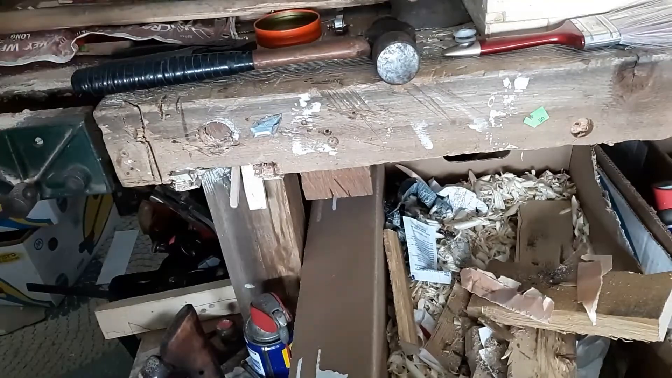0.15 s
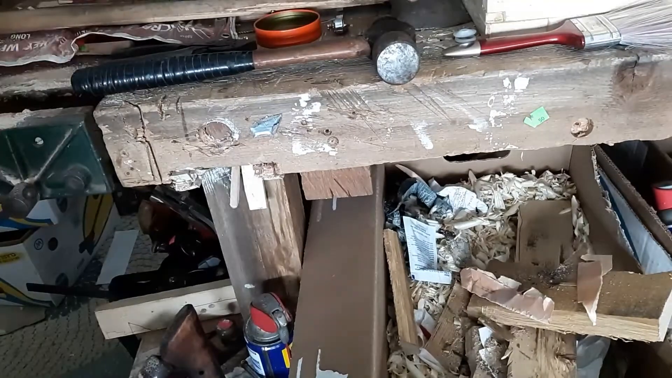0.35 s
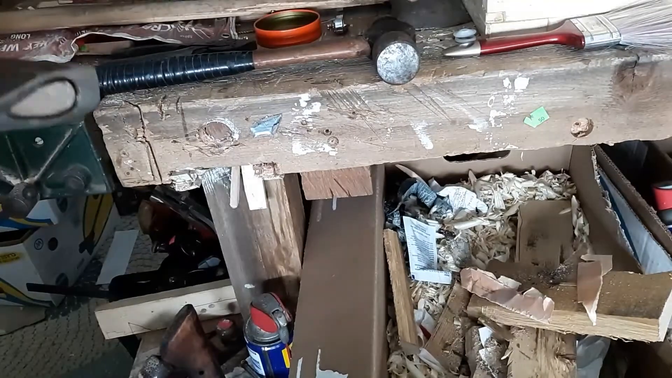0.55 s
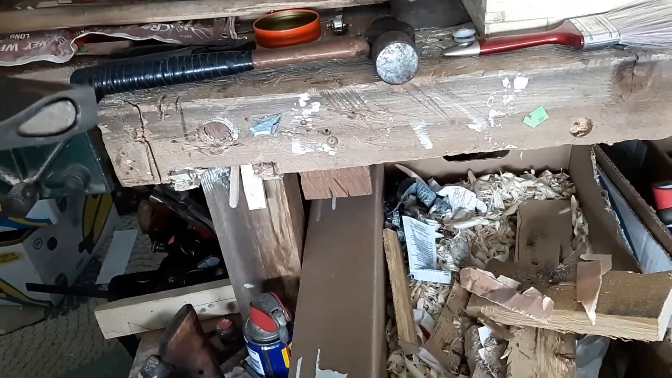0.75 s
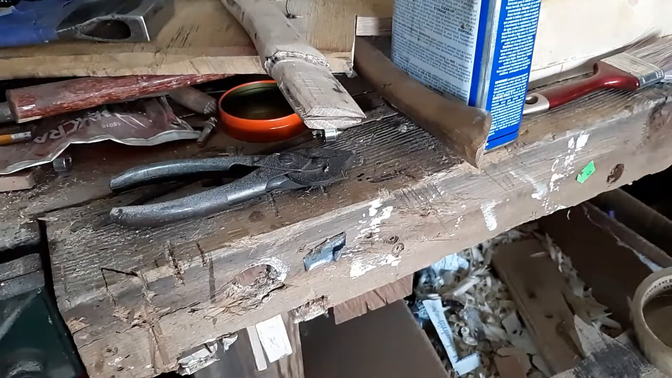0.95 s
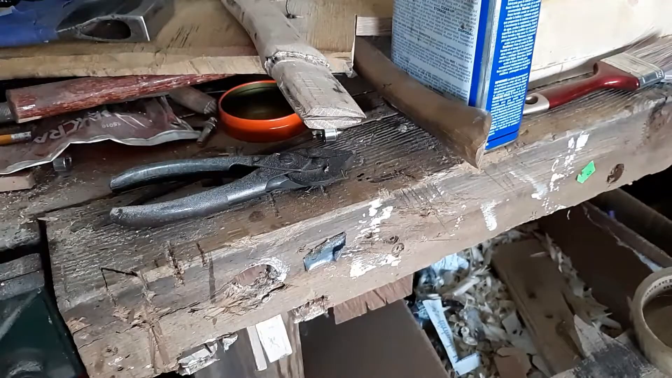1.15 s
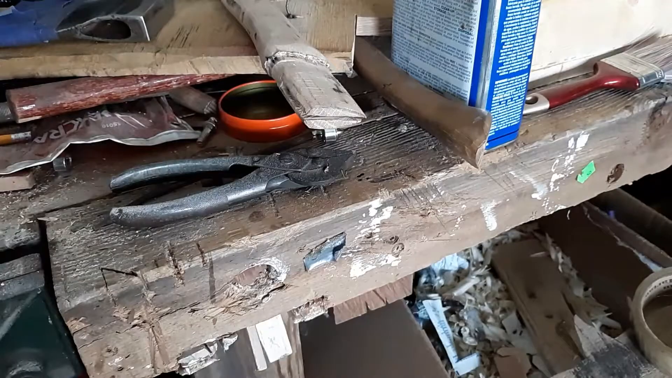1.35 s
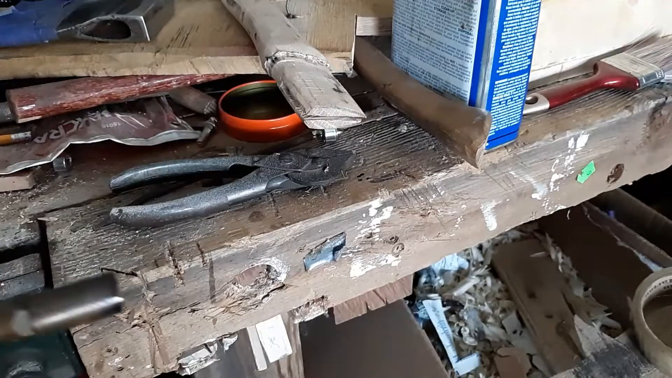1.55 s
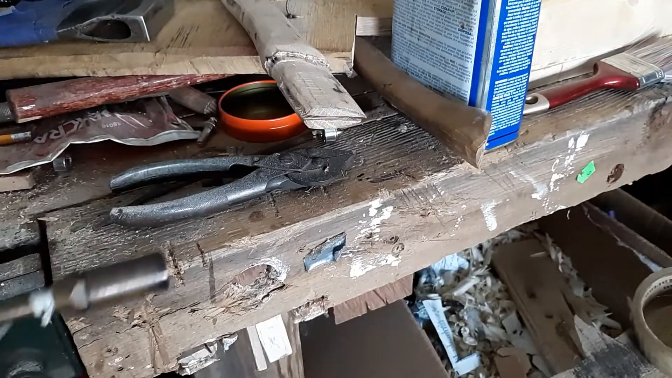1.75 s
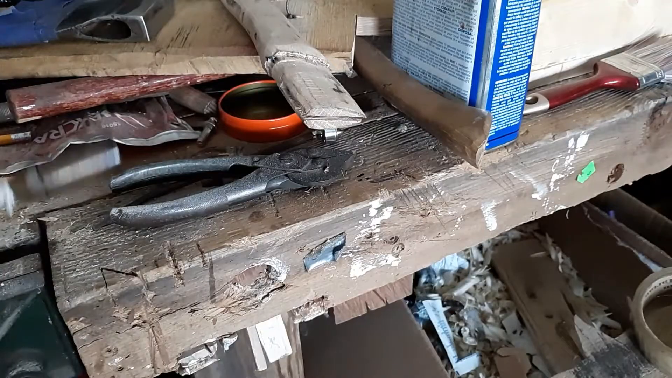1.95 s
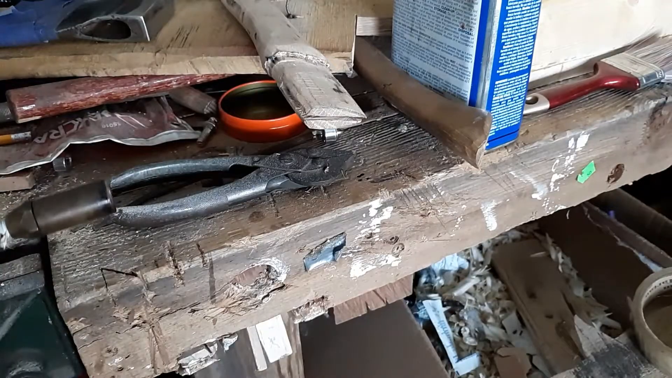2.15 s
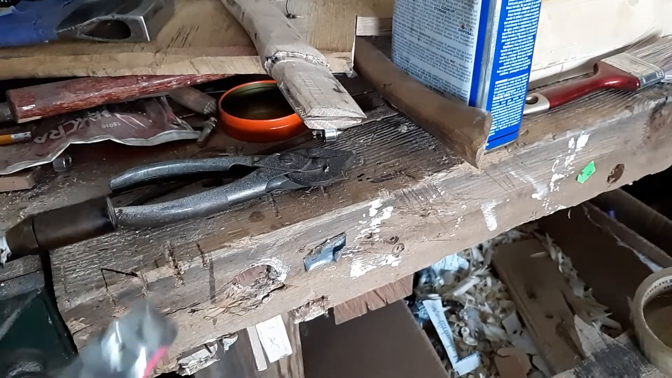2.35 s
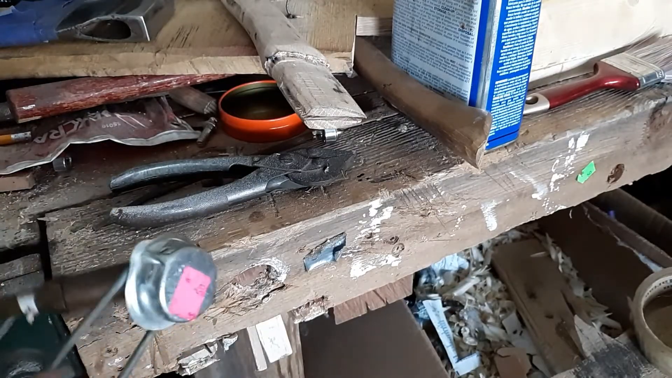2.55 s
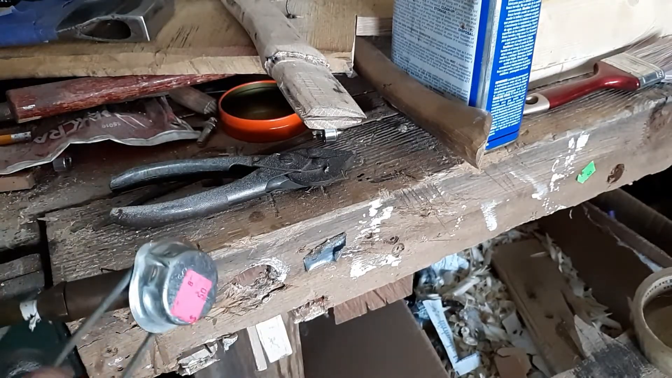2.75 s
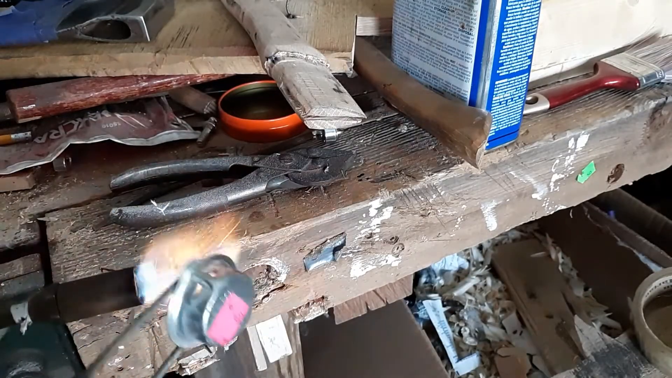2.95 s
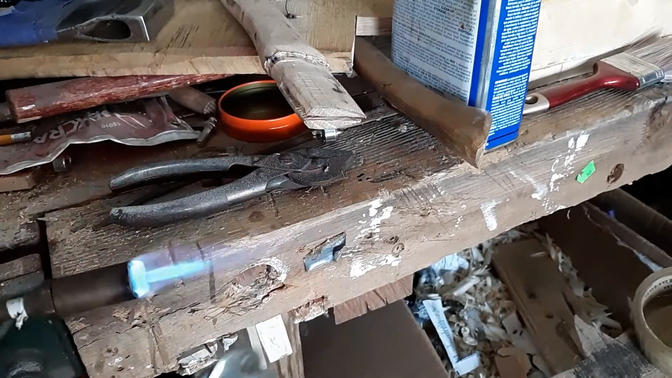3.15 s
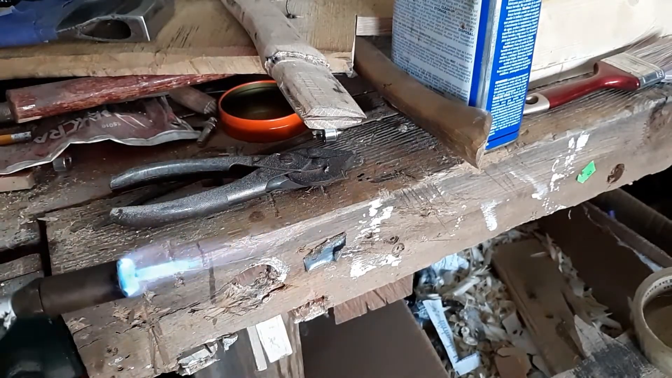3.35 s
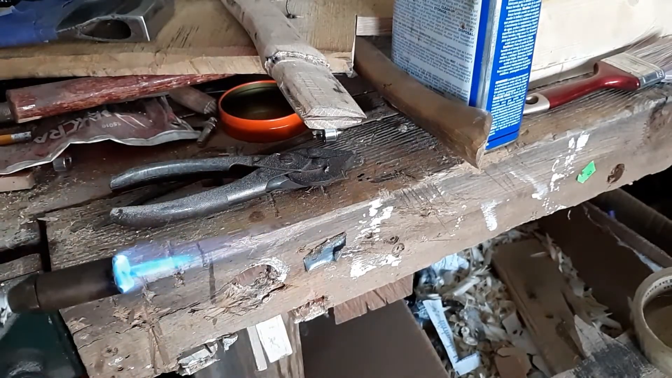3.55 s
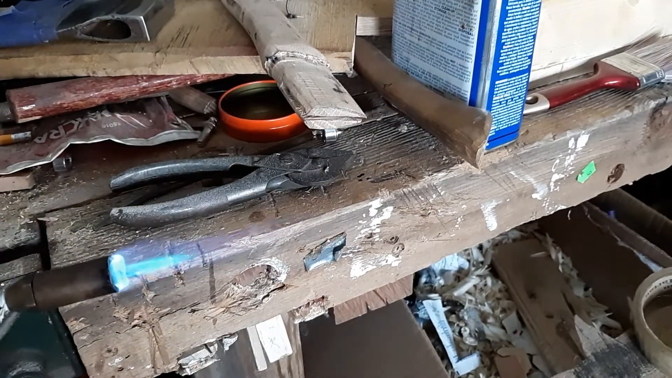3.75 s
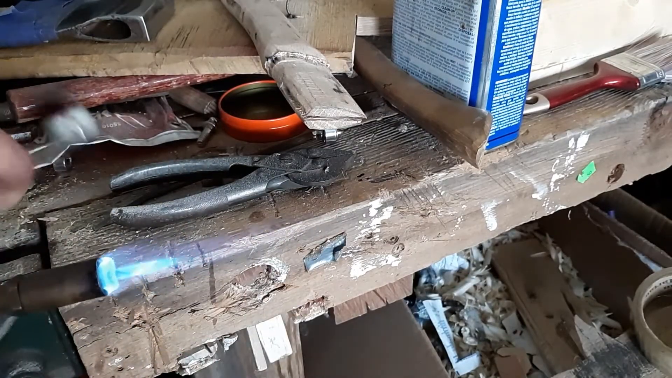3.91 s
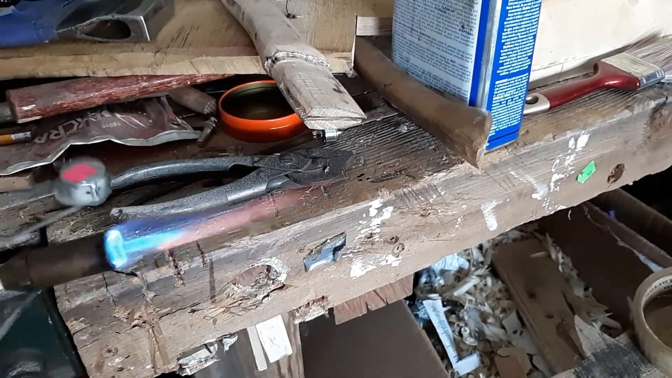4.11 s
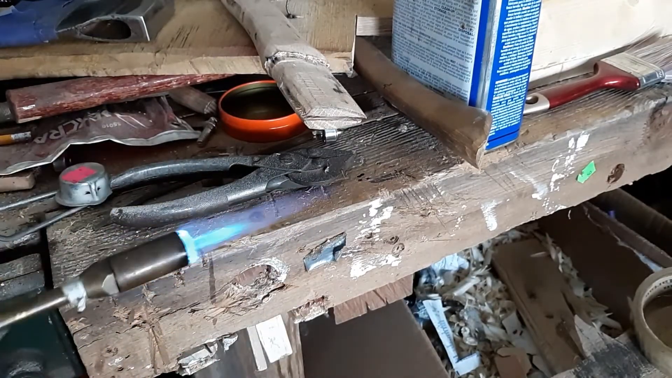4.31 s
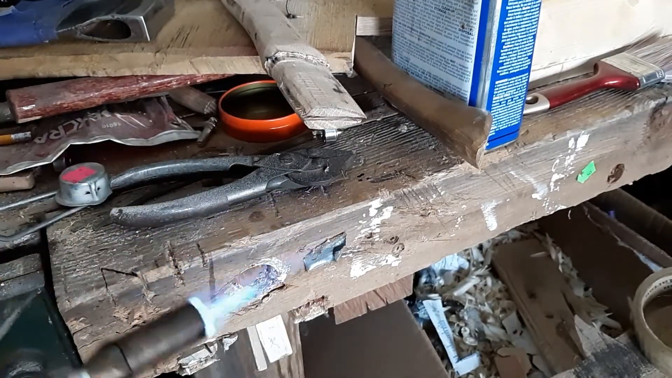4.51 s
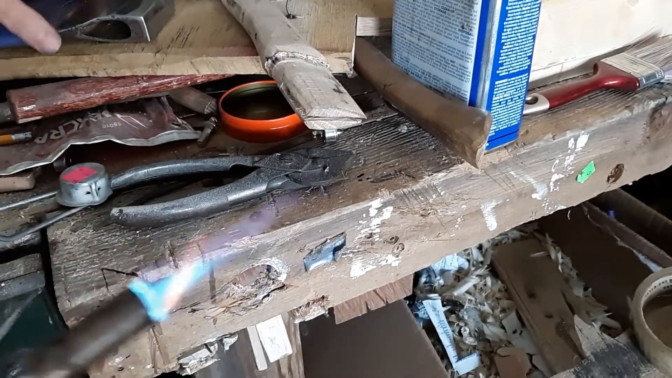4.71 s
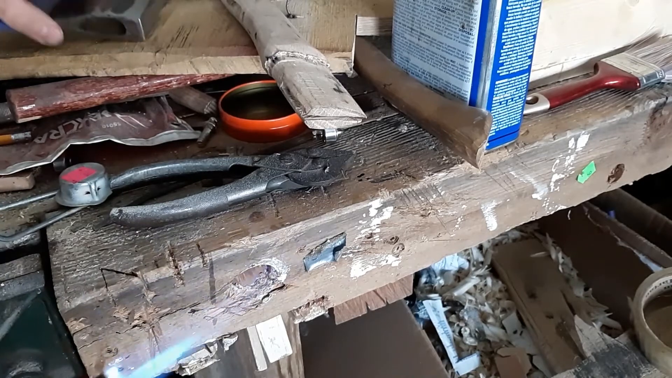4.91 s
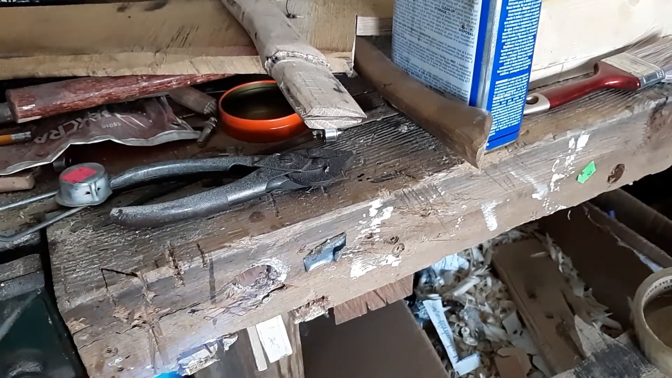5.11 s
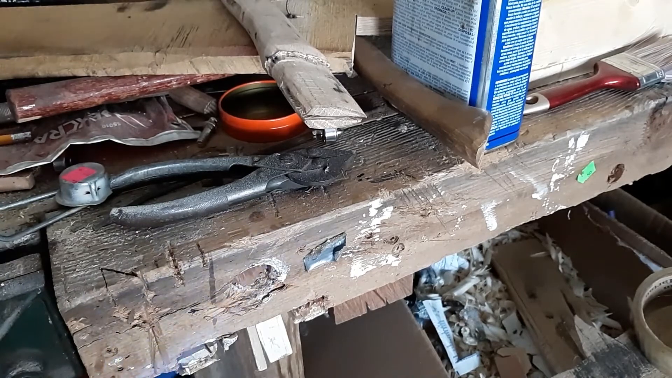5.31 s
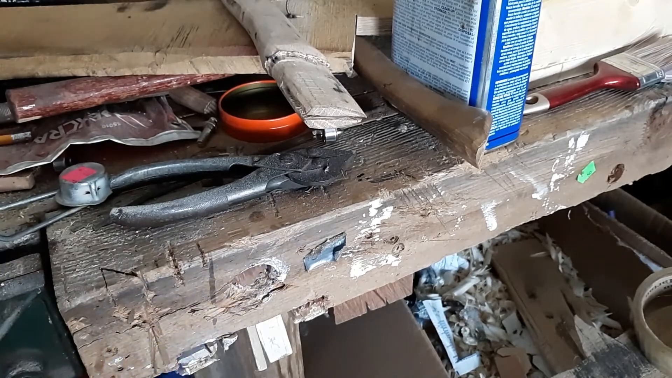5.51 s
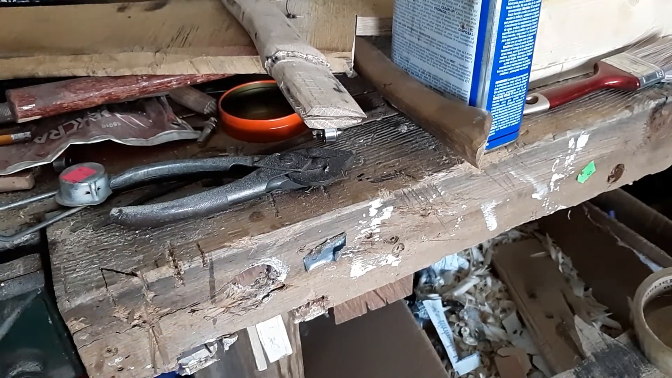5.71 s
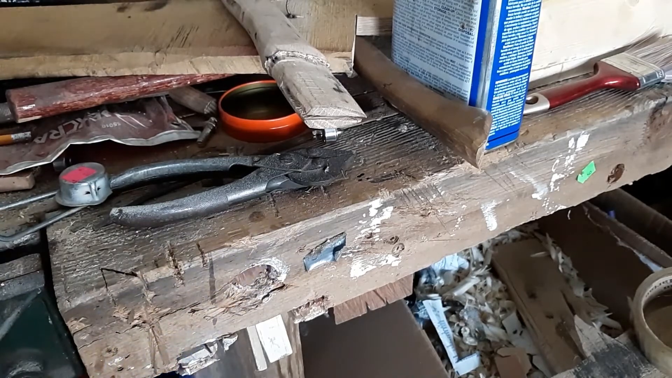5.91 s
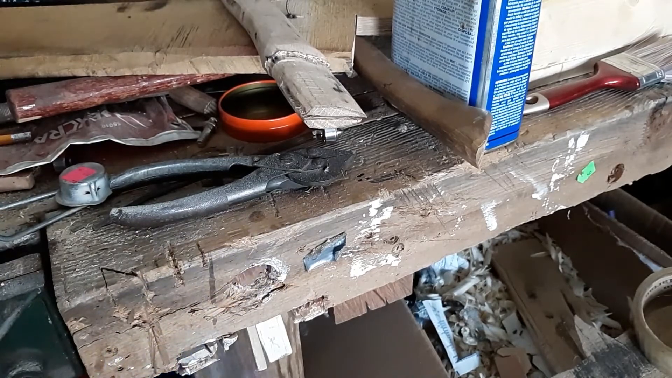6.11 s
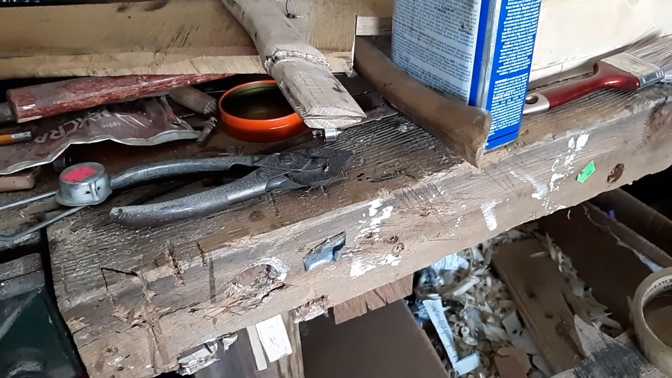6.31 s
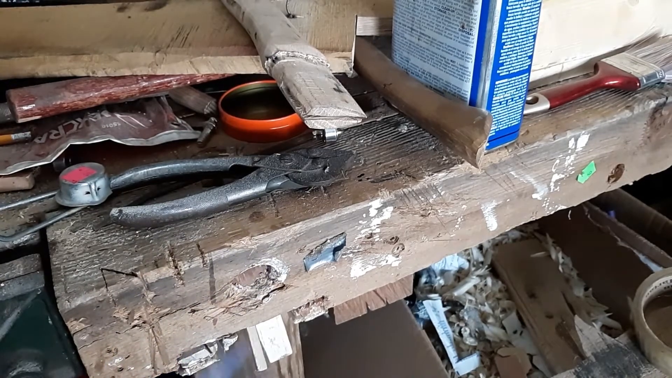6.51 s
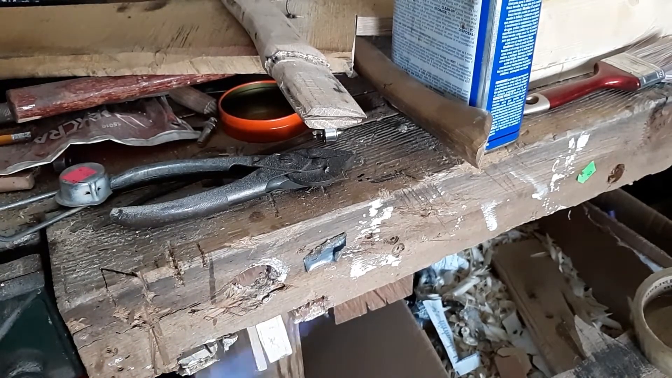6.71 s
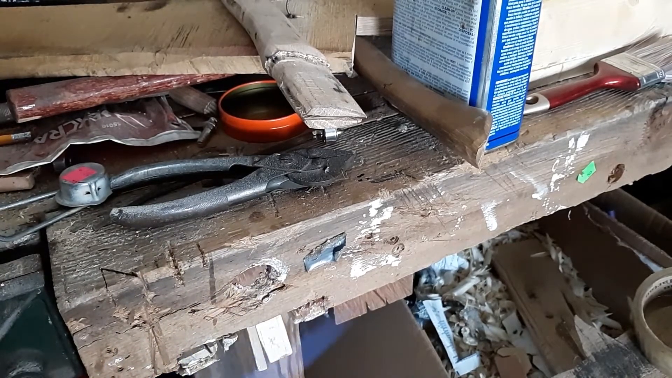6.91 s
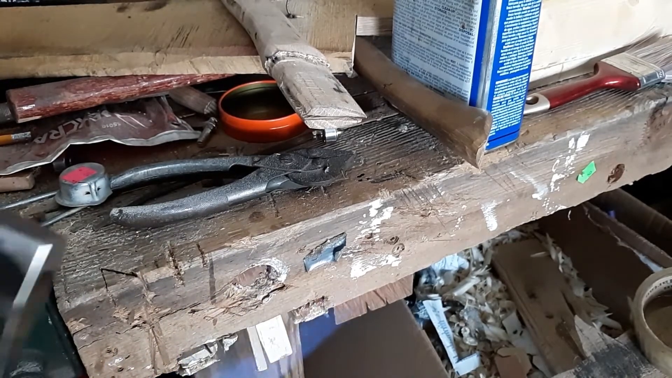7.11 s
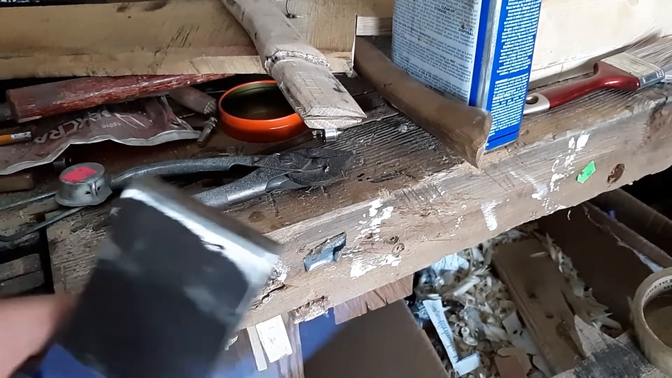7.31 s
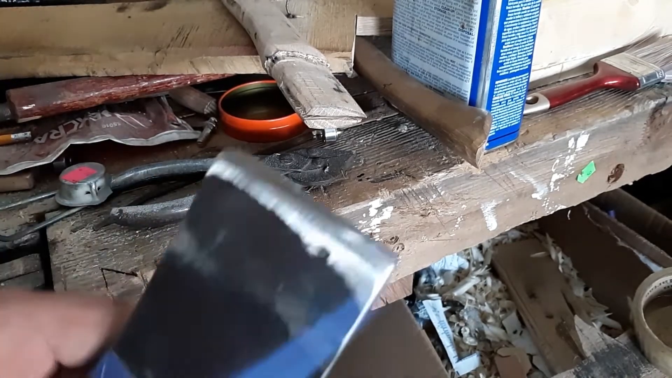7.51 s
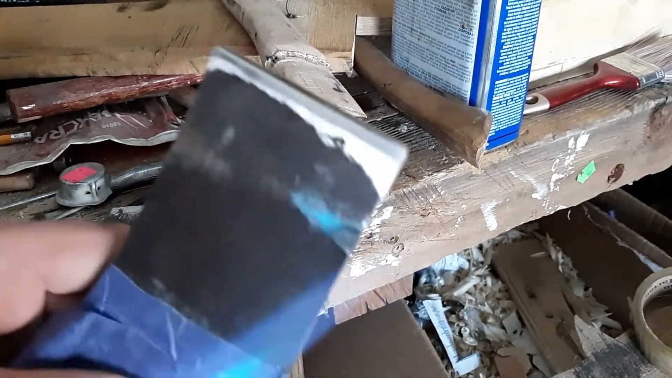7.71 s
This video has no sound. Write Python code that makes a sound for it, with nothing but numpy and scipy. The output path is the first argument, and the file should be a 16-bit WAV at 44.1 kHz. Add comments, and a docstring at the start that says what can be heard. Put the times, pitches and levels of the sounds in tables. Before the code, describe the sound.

Close in a quiet workshop, soft sliding, rustling and small knocks on a wooden bench give way to a thin, whistling gas hiss. A flint striker rasps several times, bright and metallic, then the gas catches with a low puff and burns in a steady, crackly roar. The striker is put down with a sharp clack while the flame flutters, growing louder near the end.

```python
"""A gas torch close to a phone in a quiet workshop: the valve opens and the jet hisses as coloured noise,
a flint striker rasps four times (noise bursts ringing a steel cup), the gas catches, and the flame roars
as pulses on turbulence while the torch is waved about. Before that, things are moved on the bench: noise
slides, rustles and taps, and knocks built from decaying partials. A faint whistle, room air and mains hum
lie beneath. Gain control, soft peaks and a band limit close the chain."""
import sys
import numpy as np
from scipy import signal
from scipy.fft import rfft, irfft, next_fast_len
from scipy.io import wavfile
from scipy.ndimage import uniform_filter1d, minimum_filter1d, map_coordinates

SR = 44100
rng = np.random.default_rng(int(sys.argv[2]) if len(sys.argv) > 2 else 0)


def master_out(mix):
    """Clip the mix to full scale and print it as 16-bit PCM to the path in sys.argv[1]."""
    frames = np.transpose(np.atleast_2d(mix))
    ceiling = np.clip(frames, -1, 1)
    pcm = np.round(ceiling * 32767).astype(np.int16)
    wavfile.write(sys.argv[1], SR, pcm)


N = 346626
LEAD_S = .04  # rise time kept before a burst's hold
CATCH_S = 2.85  # the gas catches


def amp(db):
    """Decibels to amplitude."""
    return 10 ** (np.asarray(db) / 20)


def unit(x):
    """Scales to rms 1."""
    return x / np.sqrt(np.mean(x ** 2) + 1e-20)


def along(points, hz):
    """Interpolates (hz, value) points on a log frequency axis."""
    f, v = np.transpose(points)
    return np.interp(np.log(hz + 1), np.log(f + 1), v)


def curves(rows):
    """One value per sample for each column after the time."""
    s, *cols = np.transpose(rows)
    return [np.interp(np.arange(N) / SR, s, c) for c in cols]


def wobble(knots_per_s):
    """A smooth random curve through normally distributed knots."""
    knots = rng.standard_normal(int(N * knots_per_s / SR) + 4)
    return map_coordinates(knots, [np.arange(N) * knots_per_s / SR])


def filtered(x, response):
    """Multiplies the spectrum of x by a complex response of frequency."""
    n = x.shape[-1]
    m = next_fast_len(n + 4096)
    return irfft(rfft(x, m) * response(np.fft.rfftfreq(m, 1 / SR)), m)[..., :n]


def modes(table):
    """Causal response of resonances (centre_hz, width_hz, level_db), summed with alternating sign."""
    def response(f):
        total = 0
        for k, (centre_hz, width_hz, db) in enumerate(table):
            damping = 1j * f * width_hz
            total = total + (-1) ** k * amp(db) * damping / (centre_hz ** 2 - f * f + damping)
        return total
    return response


def shape(spectrum):
    """Response given by (hz, db) points."""
    return lambda hz: amp(along(spectrum, hz))


def sides(pan_db):
    """Left and right gains, pan_db apart."""
    return amp(np.array([pan_db, -pan_db]) / 2)


def ports(pair, colour, alike, phase=((0, 0), (SR, 0))):
    """Two unrelated signals become a coloured left and right of given likeness and phase lead, mid rms 1."""
    def mid_side_response(hz):
        turn = np.arccos(np.clip(along(alike, hz), -1, 1)) / 2
        return colour(hz) * [np.cos(turn), np.sin(turn)]

    def lead_response(hz):
        lead_rad = np.interp(hz, *np.transpose(phase))
        return np.exp(.5j * np.outer([1, -1], lead_rad))

    mid, side = filtered(pair, mid_side_response)
    both = filtered(np.array([mid + side, mid - side]), lead_response)
    return both / np.std(both.mean(axis=0))


def patchy(depth_db):
    """Two white noises with shared time-frequency patches of random gain."""
    z = signal.stft(rng.standard_normal((2, N)), nperseg=512)[2]
    field = uniform_filter1d(rng.standard_normal(z.shape[1:]), 7, 0)
    field = uniform_filter1d(field, 10, 1)
    return signal.istft(z * amp(depth_db * unit(field)), nperseg=512)[1][:, :N]


def pockets(per_s, spread_db):
    """Two trains of sparse pulses of one sign and uneven size."""
    fires = rng.random((2, N)) < per_s / SR
    return -unit(fires * amp(spread_db * rng.standard_normal((2, N))))


def ramp_db(ms, rise_ms, hold_ms, fall_ms):
    """60 dB up, a hold from ms = 0, 60 dB down."""
    return 60 * np.minimum(np.minimum(ms / rise_ms, (hold_ms - ms) / fall_ms), 0)


def burst(rise_ms, hold_ms, fall_ms):
    """Gain over a quarter second; the hold starts LEAD_S in."""
    return amp(ramp_db(1000 * (np.arange(SR // 4) / SR - LEAD_S), rise_ms, hold_ms, fall_ms))


def swell(s, rise_ms, hold_ms, fall_ms):
    """dB over the whole scene; the hold starts at s."""
    return ramp_db(1000 * (np.arange(N) / SR - s), rise_ms, hold_ms, fall_ms)


def add(out, s, sound):
    """Lays a sound in at a time."""
    place = out[:, round(s * SR):][:, :sound.shape[1]]
    place += sound[:, :place.shape[1]]


def rub(centre_hz, width_hz):
    """A quarter second of noise through one wide resonance, twice; partly shared by the ports."""
    n = SR // 4
    noise = rng.standard_normal(n) + 0.99 * rng.standard_normal((2, n))
    return unit(filtered(noise, lambda f: modes([(centre_hz, width_hz, 0)])(f) ** 2))


def room_alike():
    """Likeness of the ports for room sounds."""
    # hz, likeness
    return [(100, 0.53), (600, 0.27), (2000, 0.045)]


def bench():
    """Sliding is low coloured noise under a level curve; rustling is brighter noise in six swells."""
    # start_s, level_db
    slide_points = [(0.0, -68), (0.056, -75), (0.152, -64), (0.168, -64), (0.332, -69.5), (0.394, -85.5),
                    (0.8, -78.5)]
    # hold_start_s, level_db
    rustle_points = [(.09, -67), (.145, -62.5), (.21, -61.5), (.255, -71), (.3, -63), (.34, -74)]
    # relative spectra: hz, level_db
    slide_spectrum = [(200, -26), (450, 3), (650, -1.5), (1200, -12), (2500, -24)]
    rustle_spectrum = [(800, -5), (2000, 0.5), (6500, -0.5), (8000, -14), (16000, -20)]
    rise_ms, hold_ms, fall_ms = 160, 9.3, 200
    slide_db, = curves(slide_points)
    slide_gain = amp(slide_db + swell(0, 1, 776, 100))
    slide = slide_gain * ports(rng.standard_normal((2, N)), shape(slide_spectrum), room_alike())
    rustle_gain = sum(amp(db + swell(s, rise_ms, hold_ms, fall_ms)) for s, db in rustle_points)
    rustle_gain = rustle_gain * amp(swell(0, 1, 480, 90) + 2.8 * wobble(260))
    rustle = rustle_gain * ports(patchy(depth_db=1.5), shape(rustle_spectrum), room_alike())
    return sides(-3)[:, None] * (slide + rustle)


def room():
    """Still air is steady patchy noise; mains hum is two sines of wavering level."""
    # relative spectrum: hz, level_db
    air_spectrum = [(15, -40), (25, -41), (76, -3.5), (195, -12.5), (242, -14.5), (439, -20.5), (591, -21),
                    (911, -24), (1840, -25.5), (2050, -25), (16000, -28)]
    # pitch_hz, mean_rms_db
    hum_partials = [(120, -92), (240, -92)]
    air = amp(-76.5) * ports(patchy(depth_db=2.5), shape(air_spectrum), room_alike())
    t = np.arange(N) / SR
    hum = sum(amp(db + 4 * wobble(8)) * np.sqrt(2) * np.sin(2 * np.pi * hz * t) for hz, db in hum_partials)
    return air + hum


def taps():
    """Small rubs and taps of tools: short bursts of wide-band noise."""
    # hold_start_s, rms_db, centre_hz, width_hz (per filter pass), left_over_right_db, hold_ms, fall_ms
    tap_rows = [(0.14, -56.5, 1700, 3400, 3, 13, 55), (0.37, -58, 4800, 2900, -8, 4.9, 84),
                (0.38, -66, 1880, 430, -6, 5, 50), (1.825, -75, 300, 600, 0, 15, 60),
                (.808, -73, 4000, 2000, -3, 30, 100), (.82, -77, 6200, 1400, -3, 25, 90),
                (.808, -69, 1250, 1800, -3, 20, 90), (3.9495, -28, 2620, 1600, 7, 1.2, 9),
                (3.954, -34, 1800, 1400, 0, 2, 14), (.149, -59, 2400, 2500, -6, 6, 45),
                (7.445, -34, 3800, 3300, -8, 1.52, 17)]
    rise_ms = 12
    out = np.zeros((2, N))
    for s, db, hz, width_hz, pan_db, hold_ms, fall_ms in tap_rows:
        tap = rub(hz, width_hz) * burst(rise_ms, hold_ms, fall_ms)
        add(out, s - LEAD_S, sides(pan_db)[:, None] * amp(db) * tap)
    return out


def knocks():
    """Each knock rings one object: decaying sines of unsteady level, slightly out of phase between ports."""
    # time_s, level_db, left_over_right_db, rise_time_constant_ms; one row per object
    knock_rows = [(0.142, -40, -14.5, 1.5), (0.807, -46.5, -4, 6), (3.9495, -28, -11, 0.5)]
    # per object, its partials: pitch_hz, level_db, t60_s
    bodies = [
        [(345, -12, 0.05), (500, -18, 0.054), (840, -3.5, 0.08), (1580, -5.5, 0.076), (2310, -9, .05)],
        [(794, -12, 0.093), (1200, -2.5, 0.115), (1415, -11, 0.078), (1630, -10, 0.13), (2370, -12, 0.11),
         (2638, -8, 0.12), (4200, -19, .05)],
        [(1590, -3, .03), (1990, -5, .03), (2700, 0.5, 0.02), (4120, 1, 0.035), (5560, -6, 0.016)],
    ]
    out, t = np.zeros((2, N)), np.arange(SR // 4) / SR
    for (s, db, pan_db, rise_ms), body in zip(knock_rows, bodies):
        ring = 0
        for hz, level_db, t60_s in body:
            decay = amp(level_db - 60 * t / t60_s + 2 * wobble(140)[:len(t)])
            phase_turns = rng.random() + 0.21 * rng.standard_normal((2, 1))
            ring = ring + decay * np.sin(2 * np.pi * (hz * t + phase_turns))
        rise = 1 - np.exp(-1000 * t / rise_ms)
        add(out, s - .003, sides(pan_db)[:, None] * amp(db) * rise * ring)
    return out


def whistle():
    """A faint narrow whistle swells and fades: noise through one sharp resonance, twice."""
    # peak_s, peak_db, edge_ms_per_60_db
    swells = [(.24, -67, 448), (.63, -80, 400)]
    gain = sum(amp(db + swell(s, ms, 0, ms)) for s, db, ms in swells)
    noise = rng.standard_normal((2, N))
    return gain * ports(noise, lambda hz: modes([(3550, 160, 0)])(hz) ** 2, room_alike())


def jet():
    """Gas leaves the orifice as a wide hiss; until it burns it sounds and pipes the cold tube's resonances."""
    # before and after lighting: time_s, treble_db, left_over_right_db
    gas_before, gas_after = [
        [(1.14, -67.5, -3), (1.172, -67, -3), (1.276, -62.5, -4), (1.308, -62.5, -3), (1.536, -63.5, 0.5),
         (1.736, -60.5, 0), (2.31, -64, 0.5), (2.506, -65, 0), (2.546, -66, -3), (2.58, -61.5, 1)],
        [(4.0, -63.5, 1.5), (4.19, -61, 3.0), (4.3, -59, -1), (4.63, -64.5, 1), (5.02, -58, 0.5),
         (5.33, -65, 1), (5.69, -63, -2), (7.2, -64, 1.5), (7.72, -55, 0.5), (7.86, -53.5, 1)],
    ]
    # cold tube: time_s, level_db, lowest_resonance_hz
    tone_points = [(1.11, -57.5, 4630), (1.3, -51, 4830), (1.424, -66, 4720), (1.608, -53.5, 4820),
                   (1.906, -54, 4550), (1.91, -56, 4550), (2.346, -57, 4820), (2.374, -63, 4720),
                   (2.446, -55.5, 4830), (2.6, -65, 4840)]
    # tube resonances: centre_hz, width_hz, level_db (per filter pass, of two)
    tube = [(4770, 460, 3.5), (6470, 180, -1.5)]
    # relative spectrum: hz, level_db
    hiss_spectrum = [(1800, -20.5), (3000, -13.5), (3500, -3), (4200, -3), (6500, 6), (7700, -6.5),
                     (9700, -9.5), (11000, -1), (12100, 1.5), (12700, -4), (16000, -13.5)]
    # hz, likeness of the ports
    alike = [(3000, 0.31), (9000, 0.12), (13000, 0.29)]
    # hz, left_lead_rad
    phase = [(0, 0), (3000, -3), (3600, -1), (5600, -1.9), (6550, .2), (8440, 1.5), (9300, 3.1), (11500, 4),
             (12600, 2.4), (16400, -1)]
    # ragged rising strand and breathy band: from_hz, to_hz, level_db, width_hz
    piping = [(2310, 2700, -71, 170), (2500, 2560, -74, 600)]
    valve_s, valve_rise_ms, hiss_over_treble_db = 1.116, 84, 6.5
    pipe_s, pipe_hold_ms, pipe_edge_ms = 1.675, 320, 200
    low_scale, high_scale = .96, 1.04  # tube tone cross-fades between two scaled copies
    t = np.arange(N) / SR

    hiss_db, pan_db = curves(gas_before + gas_after)
    hiss = ports(patchy(depth_db=1.1), shape(hiss_spectrum), alike, phase)

    def tube_noise(scale):
        return ports(patchy(depth_db=1.3), lambda hz: modes(tube)(hz / scale) ** 2, alike, phase)

    tone_db, tone_hz = curves(tone_points)
    mix = np.clip((tone_hz / tube[0][0] - low_scale) / (high_scale - low_scale), 0, 1)
    tone = np.sqrt(1 - mix) * tube_noise(low_scale) + np.sqrt(mix) * tube_noise(high_scale)

    progress = np.minimum((t - pipe_s) / pipe_hold_ms * 1000, 1)
    pipe = 0
    for from_hz, to_hz, db, width_hz in piping:
        pitch_hz = from_hz + (to_hz - from_hz) * progress + 35 * wobble(25)
        carrier = np.sin(2 * np.pi * np.cumsum(pitch_hz) / SR)
        pipe = pipe + amp(db) * unit(wobble(width_hz)) * carrier
    pipe = pipe * amp(swell(pipe_s, pipe_edge_ms, pipe_hold_ms, pipe_edge_ms) + 4 * wobble(30))

    gas = amp(hiss_db + hiss_over_treble_db) * hiss + (t < CATCH_S) * amp(tone_db) * tone
    valve_db = 60 * np.minimum((t - valve_s) * 1000 / valve_rise_ms, 0)
    waver_db = .9 * wobble(14)
    return sides(pan_db) * amp(valve_db + waver_db) * gas + pipe * np.array([[.6], [1.4]])


def striker():
    """Each stroke is a swarm of tooth contacts that rings the steel cup, a little differently at each port."""
    # flint catches and drags on the file, last the striker is laid down; the grip shifts the cup's modes:
    # hold_start_s, main_level_db, low_over_main_db, high_over_main_db (before its pan), rise_ms, fall_ms,
    # main_mode_hz, low_mode_hz
    rasps = [(2.6335, -26, 3, -14, 6, 10, 6440, 3800), (2.6362, -15, -5, -15, 3, 22, 6500, 3600),
             (2.65, -34, -2, -10, 50, 50, 6400, 3620), (2.705, -33, 3, -2, 35, 25, 6600, 4100),
             (2.716, -11.5, -11, -16, 9, 9, 6520, 3700), (2.7215, -20, -4, 3, 4, 12, 6500, 3500),
             (2.731, -39.5, -0.5, 5, 23, 58, 6500, 3740), (2.802, -19, 4, -19, 2, 24, 6270, 3830),
             (2.8072, -5, -20, -15, 1, 14, 6570, 3570), (2.819, -35, -5, -6, 43, 106, 6600, 3630),
             (2.8875, -14, -14.5, -18, 14, 6, 6680, 3950), (2.891, -12.5, -17, -12, 8, 17, 6700, 3300),
             (2.9, -26, -11, -7.5, 74, 73, 6750, 3540), (3.916, -36.5, 2.5, 5, 4, 12, 6530, 4380),
             (3.923, -46, 1, 5, 10, 14, 6400, 4500), (3.93, -47, 2, 5, 14, 20, 6400, 4700)]
    # cup mode groups: centre_hz, width_hz, level_db (per filter pass, of two; main and low get shifted)
    cup_main = [(6540, 370, 5.5), (5430, 460, -2), (5000, 130, -2)]
    cup_low = [(3670, 440, 5.5), (5330, 1000, -2), (2620, 3300, -28), (1300, 1000, -8.5)]
    cup_high = [(7800, 1200, -20.5), (10200, 6000, 7), (10750, 200, 11.5), (12800, 240, 10.5),
                (15000, 520, 10.5)]
    hold_base_ms, hold_per_fall = 0.99, 0.057
    pan_db, high_pan_db = -0.5, 4.0
    grit_db = 2.5  # spread of the tooth contacts' sizes
    out = np.zeros((2, N))

    def ring(teeth, group, scale):
        return unit(filtered(teeth, lambda hz: modes(group)(hz * scale) ** 2))

    for s, db, low_db, high_db, rise_ms, fall_ms, main_hz, low_hz in rasps:
        stroke = burst(rise_ms, hold_base_ms + hold_per_fall * fall_ms, fall_ms)
        n = len(stroke)
        grit = amp(grit_db * unit(uniform_filter1d(rng.standard_normal(n), size=30)))
        contacts = rng.standard_normal(n) + .65 * rng.standard_normal((2, n))
        teeth = stroke * unit(grit) * contacts
        main = ring(teeth, cup_main, cup_main[0][0] / main_hz)
        low = ring(teeth, cup_low, cup_low[0][0] / low_hz)
        high = sides(high_pan_db)[:, None] * ring(teeth, cup_high, 1)
        cup = main + amp(low_db) * low + amp(high_db) * high
        stroke_rms = np.sqrt(np.mean(stroke ** 2))
        add(out, s - LEAD_S, sides(pan_db)[:, None] * amp(db) * stroke_rms * cup)
    return out


def puffs():
    """Low puffs of air and gas: noise through one very wide resonance, twice, alike at both ports."""
    # hold_start_s, rms_db, centre_hz
    puff_rows = [(2.64, -61.5, 149), (2.716, -55.5, 170), (2.82, -42, 218), (2.855, -50.5, 700),
                 (2.863, -43, 258), (2.906, -42.5, 704), (2.898, -33.5, 228)]
    rise_ms, hold_ms, fall_ms = 41, 14, 83
    out = np.zeros((2, N))
    for s, db, hz in puff_rows:
        noise = rng.standard_normal((1, SR // 4))
        air = unit(filtered(noise, lambda f: modes([(hz, 1.7 * hz, 0)])(f) ** 2))
        add(out, s - LEAD_S, amp(db) * air * burst(rise_ms, hold_ms, fall_ms))
    return out


def flame():
    """Pockets of gas burn one by one: pulses of one sign on turbulence; roar and crackle share them."""
    # the torch is waved about: time_s, roar_db, left_over_right_db, crackle_db, hollow_core_db, core_hz
    path = [(4.0, -39.5, 2, -43.5, -50, 560.6), (4.12, -37.5, 0.5, -43.5, -46, 760),
            (4.43, -38.5, 1.0, -45, -48.5, 580), (5.11, -38, -0.5, -43.5, -44, 599),
            (5.7, -38.5, -1.5, -44, -47, 559.3), (6.3, -39, 1, -44.5, -40.5, 700),
            (6.5, -38.5, 0, -44.5, -51, 718), (6.99, -38, 1.5, -43.5, -49.5, 660.6),
            (7.27, -37.5, 2, -43.5, -45, 639.6), (7.56, -34.5, 3, -40.5, -41.5, 620),
            (7.86, -33, 4, -43, -36.5, 601.7)]
    # relative spectra: hz, level_db
    roar_spectrum = [(18, -64), (30, -45), (168, -5), (309, -1), (423, -4), (600, -2.5), (760, -2.5),
                     (973, -6.5), (1070, -6), (1570, -15), (2080, -31), (2500, -21), (3250, -35),
                     (5500, -120)]
    crackle_spectrum = [(700, -24.5), (1500, 1), (2100, 2), (2400, -2.5), (3300, -2.5), (4650, -1),
                        (4950, 3.5), (5250, -1.5), (6600, -6), (7200, -9), (7600, -16), (12000, -22)]
    # hz, likeness of the ports
    alike = [(150, 1), (280, 1), (600, 0.85), (1500, 0.88), (3000, 0.82), (7000, 0.31)]
    # single large pockets: time_s, over_usual_pocket_db
    pops = [(3.67, 15), (4.085, 8), (7.403, 4), (7.8091, 18)]
    catch_rise_ms, flare_db, flare_decay_s = 140, 1, 0.034
    choke_s, choke_db, choke_half_s = 2.945, -3.5, 0.042  # the young flame falters once
    pockets_per_s = 1100
    beat_hz, beat_rms_db = 43, 0.94  # the flame's own beat
    core_width_hz, core_apart = 260, 0.16  # core is a noise band; share that differs between ports

    roar_db, pan_db, crackle_db, core_db, core_hz = curves(path)
    t = np.arange(N) / SR
    since_s = t - CATCH_S
    lit_db = 60 * np.minimum(since_s * 1000 / catch_rise_ms, 0)
    settle_db = flare_db * np.exp(-np.maximum(since_s, 0) / flare_decay_s)
    falter_db = choke_db * np.exp(-((t - choke_s) / choke_half_s) ** 2)
    beat = np.sin(2 * np.pi * np.cumsum(beat_hz + 2.755 * wobble(6)) / SR)
    flutter_db = .8 * wobble(45) + beat_rms_db * np.sqrt(2) * beat

    pulses = pockets(pockets_per_s, spread_db=2.5)
    for s, db in pops:
        pulses[0, round(s * SR)] = -amp(db) * np.sqrt(SR / pockets_per_s)
    roar = ports(0.45 * pulses + 0.89 * patchy(depth_db=1.3), shape(roar_spectrum), alike)
    crackle = ports(.62 * pulses + .7 * patchy(depth_db=1.8), shape(crackle_spectrum), alike)

    turning = np.exp(2j * np.pi * np.cumsum(core_hz) / SR)

    def core_band():
        return unit(np.real((wobble(core_width_hz) + 1j * wobble(core_width_hz)) * turning))

    core = core_band() + core_apart * np.outer([1, -1], core_band())
    layers = amp(roar_db) * roar + amp(crackle_db) * crackle + amp(core_db + 2.2 * wobble(11)) * core
    gain = sides(pan_db) * amp(lit_db + settle_db + falter_db + flutter_db)
    fire = (since_s > -.05) * gain * layers
    # the louder port is the nearer one and hears first
    lead_samples = 0.84 * (pan_db - .6)
    left = map_coordinates(fire[0], [np.arange(N) + lead_samples])
    right = map_coordinates(fire[1], [np.arange(N) - lead_samples])
    return np.array([left, right])


def flaps():
    """The moving flame flaps: soft-edged bursts of wide-band noise."""
    # hold_start_s, rms_db, centre_hz, hold_ms
    flap_rows = [(4.085, -39.5, 1200, 65), (5.142, -39, 5900, 20.6), (5.235, -44, 5160, 16),
                 (5.773, -44, 5600, 14)]
    width_per_centre, edge_per_hold = 0.82, 2.4
    out = np.zeros((2, N))
    for s, db, hz, hold_ms in flap_rows:
        edge_ms = edge_per_hold * hold_ms
        add(out, s - LEAD_S, amp(db) * rub(hz, width_per_centre * hz) * burst(edge_ms, hold_ms, edge_ms))
    return out


def duck_db(x):
    """Gain control: loud moments pull the gain down; it holds, and glides both down and back."""
    threshold_db, excess_share = -33.5, 0.34
    hold, glide = round(0.43 * SR), round(0.47 * SR)  # seconds to samples
    power = np.abs(uniform_filter1d(np.mean(x ** 2, axis=0), SR // 100))
    level_db = 10 * np.log10(power + 1e-12)
    wanted_db = -excess_share * np.maximum(level_db - threshold_db, 0)
    # origins make both windows look back
    held_db = minimum_filter1d(wanted_db, hold, origin=(hold - 1) // 2)
    return uniform_filter1d(held_db, glide, origin=(glide - 1) // 2)


def scene():
    """Sums all sources."""
    handling = bench() + room() + taps() + knocks() + whistle()
    return handling + jet() + striker() + puffs() + flame() + flaps()


def record(dry):
    """The phone ducks after loud sounds, rounds off the highest peaks and keeps nothing above its band limit."""
    ceiling, band_limit_hz = .93, 15750
    ducked = dry * amp(duck_db(dry))
    soft = ducked / (1 + np.abs(ducked / ceiling) ** 6) ** (1 / 6)
    return filtered(soft, lambda hz: hz < band_limit_hz)


dry = scene()
out = record(dry)
master_out(out)
```